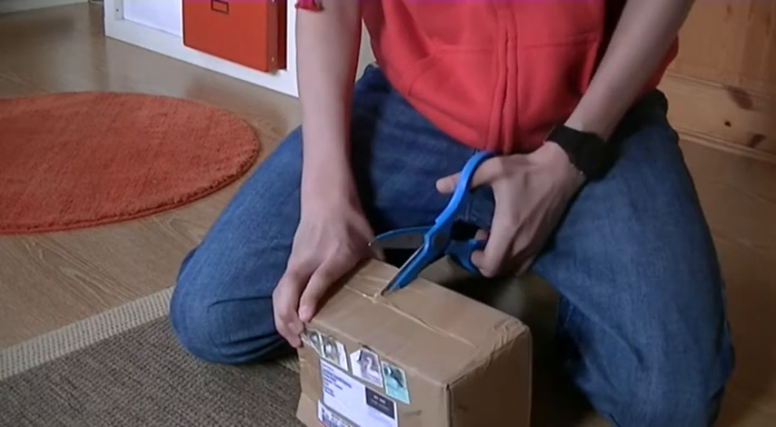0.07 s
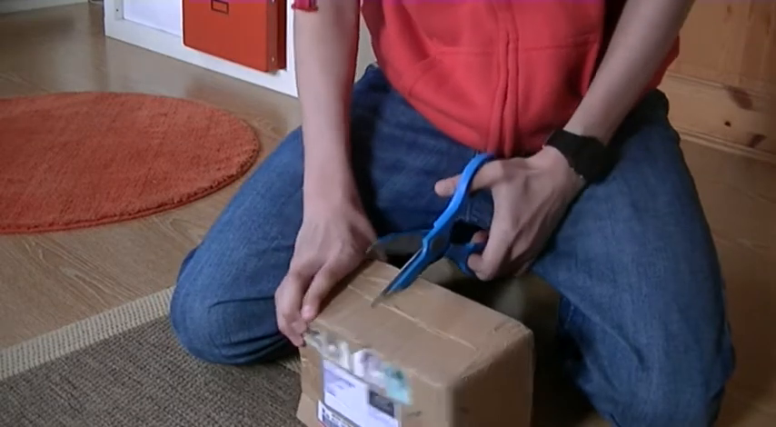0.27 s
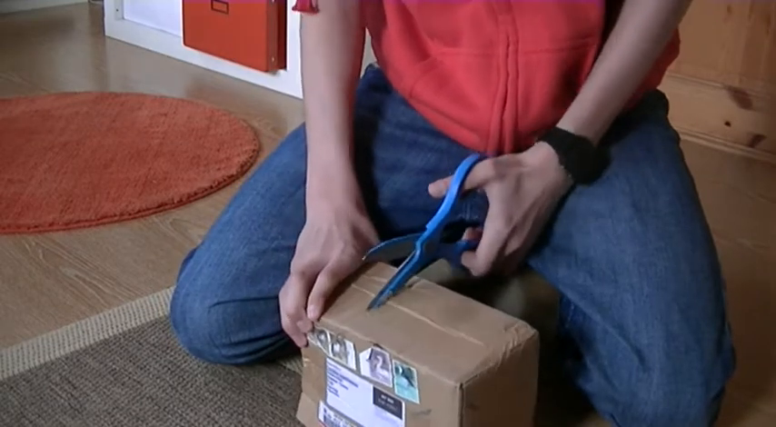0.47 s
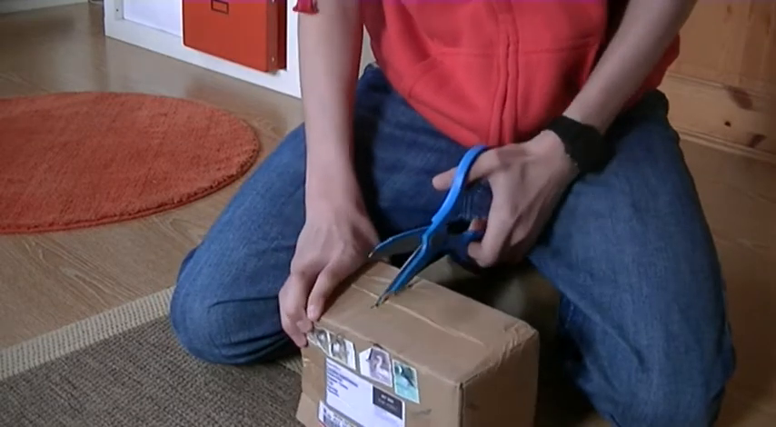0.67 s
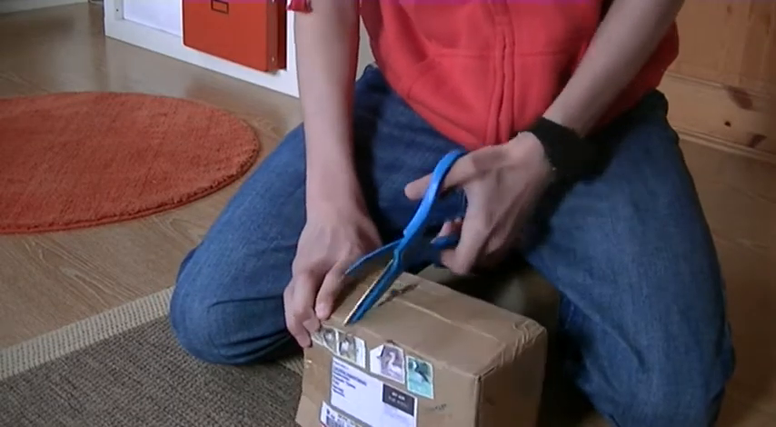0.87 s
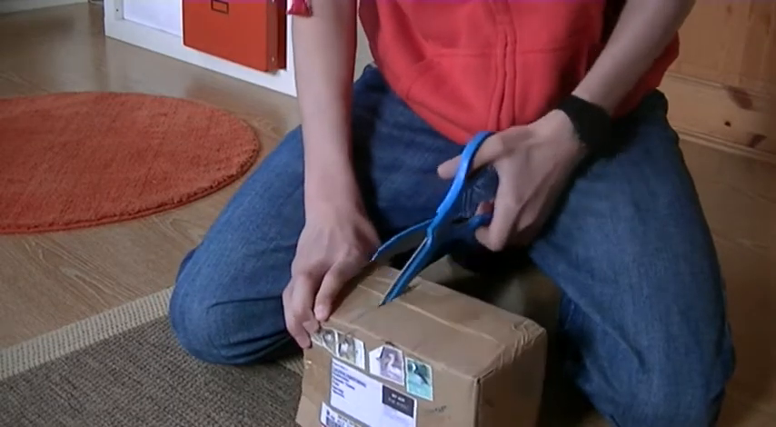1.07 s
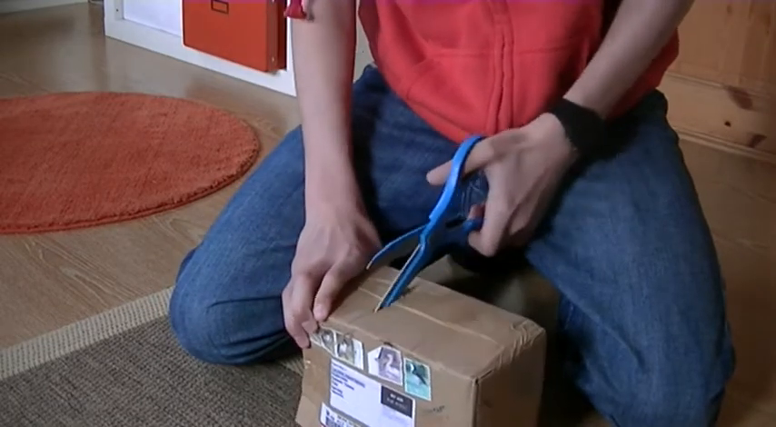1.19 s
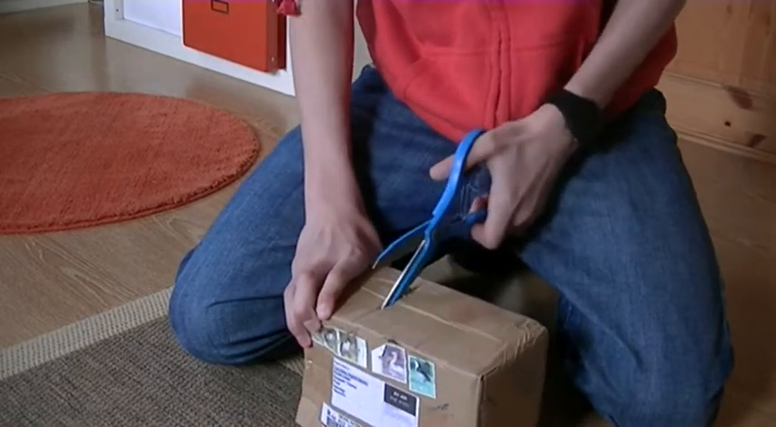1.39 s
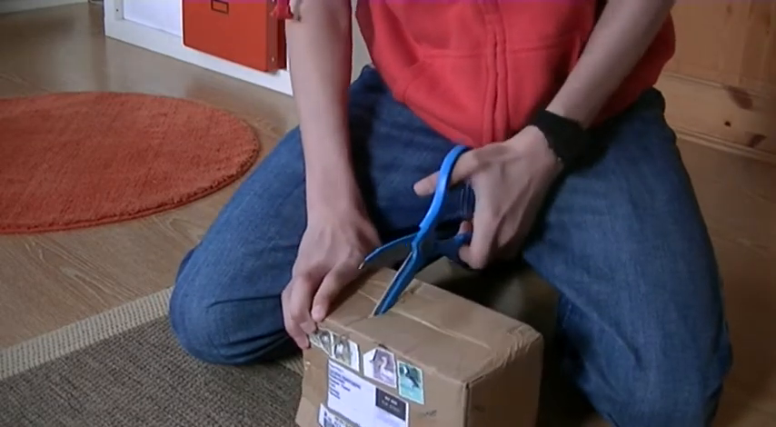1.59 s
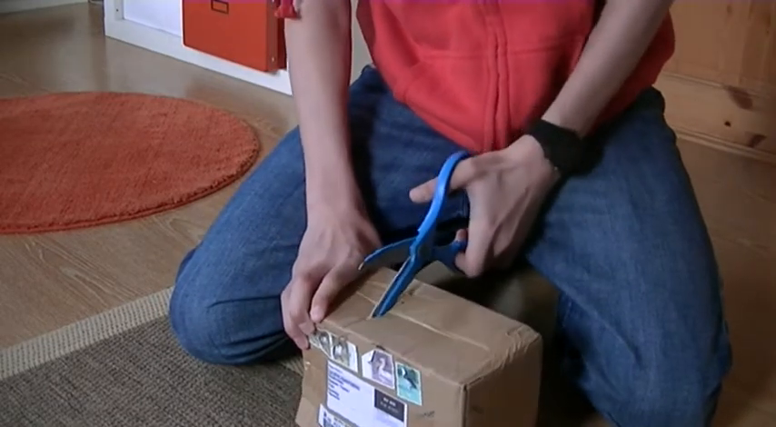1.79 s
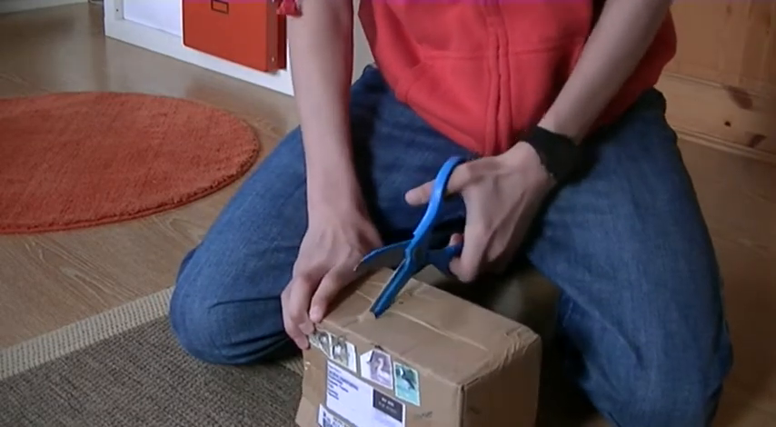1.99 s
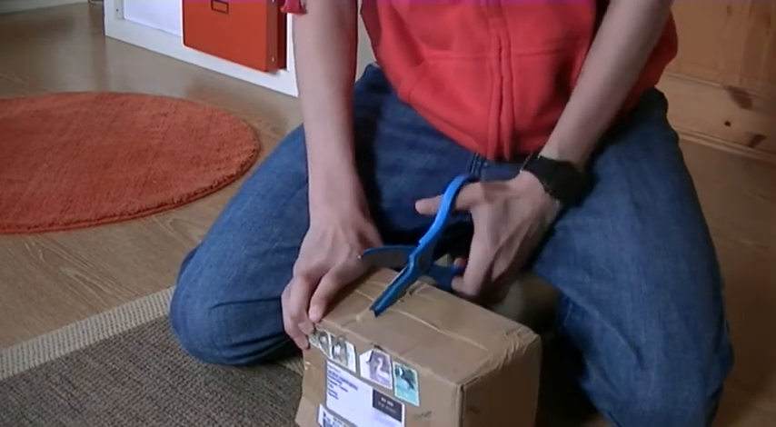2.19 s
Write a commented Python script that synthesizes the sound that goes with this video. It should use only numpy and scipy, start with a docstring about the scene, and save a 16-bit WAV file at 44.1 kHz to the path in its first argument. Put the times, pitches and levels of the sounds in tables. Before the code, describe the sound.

Cardboard box being cut open with scissors: four short tape rips, snaps, scrapes and hollow knocks

```python
"""Packing tape on a cardboard box crackles under strain, then gives in four short rips as a blade works it.
Rips and scrapes are grainy noise swelling with each stroke; snaps, blade clicks and crackle are filtered clicks.
The blade knocks the hollow box, modelled as decaying modes, and dull crunches come from the board.
The blade also scrapes softly along the seam. A quiet room adds a steady tone and a short sparse tail."""
import sys
import numpy as np
from scipy import signal
from scipy.io import wavfile
from scipy.ndimage import uniform_filter1d

SR = 44100
rng = np.random.default_rng(int(sys.argv[2]) if len(sys.argv) > 2 else 0)


def to_wav(s):
    """Save 16-bit WAV."""
    ch = np.atleast_2d(s).T  # columns
    pcm = np.round(np.clip(ch, -1, 1) * 32767)  # PCM
    wavfile.write(sys.argv[1], SR, pcm.astype(np.int16))


N = 99225  # length in samples, 2.25 s


def amp(db):
    """Decibels to gain."""
    return 10 ** (np.asarray(db) / 20)


def unit(x):
    """Scales to an rms of 1."""
    return x / np.sqrt(np.mean(x ** 2) + 1e-20)


def read(points, hz):
    """Reads a table along a log-frequency axis."""
    f, value = np.transpose(points)
    return np.interp(np.log(hz + 1), np.log(f + 1), value)


def add(mix, s, sound):
    """Mixes a sound in at time s."""
    part = mix[max(round(s * SR), 0):][:len(sound)]
    part += sound[:len(part)]


def decay(t, t60):
    """Exponential fade that is 60 dB down at t60."""
    return np.exp(-np.log(1000) * t / t60)


BASS_HZ, TREBLE_HZ = 700, 7000  # shelf corners


def colour(x, points, bass_db=0, treble_db=0, size=4096):
    """Minimum-phase EQ: a curve of unit power, then bass and treble shelves."""
    hz = np.fft.rfftfreq(size, 1 / SR)
    bass = bass_db / (1 + (hz / BASS_HZ) ** 4)
    treble = treble_db * (1 - 1 / (1 + (hz / TREBLE_HZ) ** 6))
    log_gain = np.log(unit(amp(read(points, hz))) * amp(bass + treble))
    circle = np.concatenate([log_gain, log_gain[-2:0:-1]])
    # the Hilbert transform of the log gain gives the phase that makes the filter causal
    spectrum = np.exp(np.conj(signal.hilbert(circle)))
    taps = np.fft.ifft(spectrum).real[:size // 2]
    return signal.oaconvolve(x, taps)[:len(x)]


def ticks(per_s, spread_db):
    """Sparse random clicks of uneven size and either sign, at unit rms."""
    size = amp(spread_db * np.minimum(rng.exponential(1, N), 3))
    sign = rng.choice([-1., 1.], N)
    struck = rng.random(N) < per_s / SR
    return unit(size * sign * struck)


CATCH_S, CATCH_HZ = 0.004, 2500  # duration and width of the fibres' catches


def uneven(x, depth_db, size=128):
    """Fibres catch and let go, so level and colour shift every few milliseconds."""
    z = signal.stft(x, SR, nperseg=size)[2]
    span = max(round(CATCH_S * SR / (size / 2)), 1)
    width = max(round(CATCH_HZ * size / SR), 1)
    patches = uniform_filter1d(rng.standard_normal(z.shape), span, 1)
    patches = unit(uniform_filter1d(patches, width, 0))
    rough = signal.istft(z * amp(depth_db * patches), SR, nperseg=size)[1]
    return unit(rough[:len(x)])


STROKE_SHAPE = 1.136  # above 1 the top of the swell is rounded


def strokes(rows, points, grains):
    """Grains swell and fade with each push; rise and fall are the times to 20 dB down."""
    out = np.zeros(N)
    for top, rise, fall, db, bass_db, treble_db in rows:
        first = max(round((top - 2 * rise) * SR), 0)
        part = grains[first:round((top + 2 * fall) * SR)]
        t = (first + np.arange(len(part))) / SR - top
        push = amp(db - 20 * np.maximum(-t / rise, t / fall) ** STROKE_SHAPE)
        add(out, first / SR, colour(part * push, points, bass_db, treble_db))
    return out


# spectrum of the quiet room: f/Hz, relative level/dB per Hz
ROOM_TONE_COLOUR = [(20, -19), (55, 1.5), (130, 4), (300, 3), (700, -2), (2000, -7.5), (4000, -7),
                    (10000, -21), (13000, -15.5), (16000, -23)]
ROOM_TONE_DB = -53


def room_tone():
    """Steady coloured noise under everything."""
    return amp(ROOM_TONE_DB) * colour(rng.standard_normal(N), ROOM_TONE_COLOUR)


# reverberation of the room: f/Hz, t60/s
ROOM_DECAY = [(150, 0.39), (500, 0.23), (2000, .32), (6000, 0.32), (14000, 0.11)]


def room(x):
    """A short tail of sparse reflections, each band fading at its own rate, the top soonest."""
    taps = np.zeros(SR // 2)
    at = np.arange(130, len(taps) - 20, 20)  # one reflection in every 20 samples
    taps[at + rng.integers(0, 20, len(at))] = rng.choice([-1., 1.], len(at))
    hz, t, z = signal.stft(taps, SR, nperseg=256)
    fade = decay(t, read(ROOM_DECAY, hz)[:, None])
    tail = signal.istft(z * fade, SR, nperseg=256)[1]
    return signal.fftconvolve(x, tail / np.linalg.norm(tail))[:N]


# spells of stretched tape: start t/s, end t/s, level/dB, ticks per s
STRAINS = [(0.0, 0.037, -57, 380), (0.136, 0.247, -47.5, 330), (2.041, 2.268, -47, 670)]
# bright, thin tone of the ticks: f/Hz, relative level/dB per Hz
TICK_COLOUR = [(100, -34), (1500, -13), (3500, -4.5), (6300, -0.5), (7300, -8), (11000, -4.5), (12800, -7),
               (16000, -27)]


def crackle():
    """Stretched tape ticks at random as its glue lets go."""
    t = np.arange(N) / SR
    out = np.zeros(N)
    for start, end, db, per_s in STRAINS:
        out += amp(db) * ticks(per_s, spread_db=8.5) * ((t > start) & (t < end))
    return colour(out, TICK_COLOUR)


# blade slides: loudest t/s, rise t/s, fall t/s, level before shelves/dB, bass shelf/dB, treble shelf/dB
SCRAPES = [(0.02, 0.16, 0.045, -45, 0, 2.5), (0.175, 0.22, 0.11, -43, -3, -1),
           (0.445, 0.11, 0.095, -46, 8, 2.5), (0.535, 0.084, 0.073, -40.5, -2, 5),
           (0.70, 0.088, 0.074, -40, 5, 6.5), (0.885, 0.18, 0.14, -42, 0.5, -4.5),
           (0.955, 0.032, 0.067, -40, 8, 8), (1.105, 0.038, 0.15, -45.5, 7.5, 3),
           (1.305, 0.081, 0.051, -44.5, 0, -0.5), (1.400, 0.055, 0.041, -37.5, 3, 0.5),
           (1.61, 0.14, 0.23, -53.5, 6, 7.5), (1.812, 0.014, .06, -55, -8, 29.5),
           (2.09, 0.25, 0.11, -50.5, 4, 15), (2.145, 0.042, 0.066, -45, -16, 8),
           (2.245, 0.11, .05, -50, -2, 11)]
# tone of the blade on cardboard: f/Hz, relative level/dB per Hz
SCRAPE_COLOUR = [(40, -46), (130, -10), (290, -0.5), (700, -2.5), (1200, -2.5), (2100, 1), (3200, -6),
                 (5000, -3.5), (6400, -6.5), (7300, -5), (10800, -9), (12500, -20), (16000, -32)]
SCRAPE_GRAINS_PER_S, SCRAPE_GRIT_DB = 3000, -7


def scrapes():
    """The blade rubs over cardboard fibres in a fine, fairly even grain."""
    grit = amp(SCRAPE_GRIT_DB) * ticks(SCRAPE_GRAINS_PER_S, spread_db=3)
    grains = uneven(rng.standard_normal(N) + grit, depth_db=1.0)
    return strokes(SCRAPES, SCRAPE_COLOUR, grains)


# board crushing: loudest t/s, rise t/s, fall t/s, level before shelves/dB, bass shelf/dB, treble shelf/dB
CRUNCHES = [(0.273, 0.019, 0.068, -24, 3, -2), (0.733, 0.019, .05, -26, -4.5, 0.5),
            (1.40, 0.014, 0.031, -33, -5, 5.5)]
# dull tone of crushed board: f/Hz, relative level/dB per Hz
CRUNCH_COLOUR = [(40, -55), (150, -19.5), (300, 0.5), (500, 5), (700, -6.5), (950, -1), (1400, -4),
                 (2100, -9), (3300, -17), (6400, -17.5), (7400, -12), (11000, -27), (16000, -42)]
CRUNCH_GRAINS_PER_S = 2500


def crunches():
    """Fibres of the board give way under the blade in short, dull bursts of clicks."""
    return strokes(CRUNCHES, CRUNCH_COLOUR, ticks(CRUNCH_GRAINS_PER_S, spread_db=3.0))


# blade striking the box: t/s, impulse level/dB, contact time/s
KNOCKS = [(0.024, -31.5, 0.0041), (0.2506, -11, .0013), (0.2566, -24.5, 0.00089), (0.262, -23.5, .0007),
          (0.2700, -14, 0.00084), (0.7245, -20, 0.0008), (0.7290, -16.5, 0.00056), (1.3904, -18.5, 0.0011),
          (1.8812, -30, 0.0015)]
# resonant modes of the hollow box: f/Hz, level/dB, t60/s
BOX_MODES = [(142.6, -26.5, 0.15), (240, -20.5, 0.075), (300.6, -8.5, 0.11), (306, -26, 0.14),
             (417, -34, 0.13), (460.8, -16.5, 0.2), (515.9, -12.5, 0.24), (589, -24.5, 0.37),
             (713, -16.5, 0.1), (889.5, -13, 0.12), (948, -13.5, 0.06), (1028, -22.5, 0.32),
             (1070, -25, 0.058), (1318, -15.5, 0.24)]
BOX_LOW_HZ = 150  # the small box radiates little below this
LID_HZ, LID_T60, LID_DB = 300, 0.028, -2  # the struck lid itself flexes and soon stops
TEAR_TO_BOX_DB, SCRAPE_TO_BOX_DB = -39, -40.5  # how much tearing and scraping shake the box


def box(tearing, scraping):
    """Knocks of the blade flex the lid; they and the friction ring the hollow box."""
    blows = np.zeros(N)
    for s, db, contact in KNOCKS:
        u = np.arange(SR // 50) / SR / (contact / 2)
        push = u * np.exp(-2 * u)
        add(blows, s, -amp(db) * push / push.sum())
    t = np.arange(SR // 2) / SR
    ring = sum(amp(db) * decay(t, t60) * np.cos(2 * np.pi * hz * t) for hz, db, t60 in BOX_MODES)
    lid = amp(LID_DB) * decay(t, LID_T60) * np.cos(2 * np.pi * LID_HZ * t)
    force = blows + amp(TEAR_TO_BOX_DB) * tearing + amp(SCRAPE_TO_BOX_DB) * scraping
    sound = signal.oaconvolve(force, ring) + signal.oaconvolve(blows, lid)
    return signal.lfilter(*signal.butter(2, BOX_LOW_HZ, "high", fs=SR), sound[:N])


# single snaps of tape and clicks of the metal blade: t/s, level/dB, centre f/Hz, least sharpness Q
SNAPS = [(0.0144, -11, 8500, 1.4), (0.0967, -21, 9470, 2), (0.1127, -19.5, 9400, 1.6),
         (0.1249, -23, 9000, 2.2), (0.1396, -11, 8340, 1.1), (0.173, -12, 7500, 0.55),
         (0.1872, -14, 8630, 2.3), (0.2102, -4, 7000, 0.23), (0.24, 2, 4800, 2.3), (0.2456, -1.5, 4650, 3),
         (0.3765, -28, 8500, 1.4), (0.43, -13, 9100, 0.45), (0.732, -13, 7900, 3.6),
         (0.7850, -11.5, 6000, 2), (0.8190, -5.5, 2240, 1.9), (0.8675, -17, 8130, .8),
         (1.1744, -20, 4000, 0.82), (1.1969, -17, 9400, 0.69), (1.4257, -10, 3730, 2.2),
         (1.456, -17, 4200, 2.1), (1.5298, -27.5, 9600, 2.2), (1.5940, -22, 4120, 1.14),
         (1.7798, -19, 7500, 0.42), (1.797, -0.5, 10300, 3.8), (2.0003, -20, 10000, 2.7),
         (2.0032, -21, 10000, 2.2), (2.0192, -14, 10300, 4.7), (2.038, -16, 9400, 2.8),
         (2.0600, -24, 9500, 2), (2.0689, -14, 7200, 1.6), (2.0804, -12, 7500, 1.4),
         (2.119, -15, 7250, 1.5), (2.1330, -8.5, 5840, .7), (2.1443, -12.5, 2800, .8),
         (2.185, -20, 9000, 1.4), (2.2478, -10.5, 7250, 1.1)]
# tone shared by all snaps and clicks: f/Hz, relative level/dB per Hz
SNAP_COLOUR = [(60, -22), (300, 12), (700, 5), (2200, 4), (3300, -2), (5000, -0.5), (6400, -3.5),
               (7300, 3.5), (11000, 0), (12800, -20), (16000, -10)]
RATTLE_S, RATTLE_DB = 0.0011, -13  # decay time constant, level against the initial crack


def snaps_and_clicks():
    """Each snap or blade click is one sharp crack and a millisecond of rattle."""
    out = np.zeros(N)
    t = np.arange(SR // 80) / SR
    for s, db, hz, q in SNAPS:
        crack = amp(RATTLE_DB) * rng.standard_normal(len(t)) * np.exp(-t / RATTLE_S)
        crack[0] = 1
        q = max(q, 3 * hz / SR)  # keeps the peak filter realisable
        crack = signal.lfilter(*signal.iirpeak(hz, q, fs=SR), crack)
        crack = colour(crack, SNAP_COLOUR)
        add(out, s, amp(db) * crack / np.linalg.norm(crack))
    return out


# tape tears: loudest t/s, rise t/s, fall t/s, level before shelves/dB, bass shelf/dB, treble shelf/dB
RIPS = [(0.243, 0.035, .03, -28.5, -11, -3), (0.266, 0.05, 0.038, -21, 3, 0),
        (0.795, 0.12, 0.086, -32.5, -5, -10.5), (1.428, 0.014, 0.054, -34, -8.5, -11.5),
        (1.457, 0.052, 0.061, -33, -4, -11), (1.875, 0.072, 0.081, -28.5, -9.5, 2.5)]
# tone of tearing tape: f/Hz, relative level/dB per Hz
RIP_COLOUR = [(40, -67), (120, -5.5), (290, -2), (520, -2), (730, -0.5), (950, -7), (2200, -5), (3400, -11),
              (5000, -7), (6400, -9.5), (7300, -5), (8200, -9.5), (10900, -8.5), (12500, -18.5),
              (16000, -31)]
RIP_GRAINS_PER_S, RIP_GRIT_DB = 1200, -7


def rips():
    """The tape tears in a dense run of tiny fractures: noise laced with clicks."""
    grit = amp(RIP_GRIT_DB) * ticks(RIP_GRAINS_PER_S, spread_db=7)
    grains = uneven(rng.standard_normal(N) + grit, depth_db=2.5)
    return strokes(RIPS, RIP_COLOUR, grains)


TAPE_ROOM_DB, BOX_ROOM_DB = -11.5, -13.5  # reverb sends


def scene():
    """Tape, blade and box in the room."""
    scraping = scrapes()
    tearing = rips() + crunches()
    surface = tearing + scraping + snaps_and_clicks() + crackle()
    hollow = box(tearing, scraping)
    tail = room(amp(TAPE_ROOM_DB) * surface + amp(BOX_ROOM_DB) * hollow)
    return (surface + hollow + tail + room_tone())[None]


EDGE_HZ = 15900


def record(dry):
    """The recorder's band limit: a steep low-pass."""
    taps = signal.firwin(401, EDGE_HZ, window=("kaiser", 9), fs=SR)
    return signal.oaconvolve(dry, taps[None], "same")


dry = scene()
out = record(dry)
to_wav(out)
```